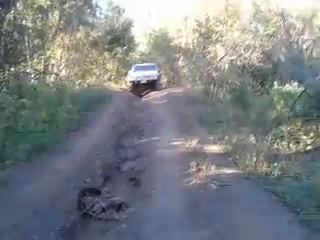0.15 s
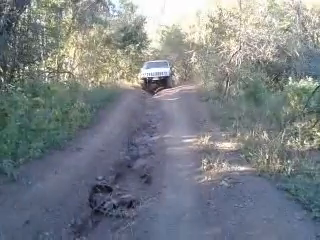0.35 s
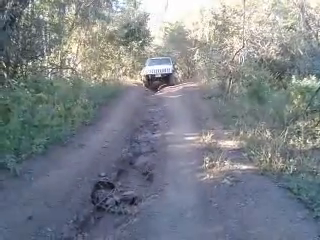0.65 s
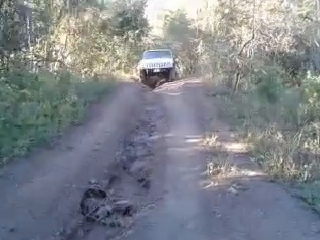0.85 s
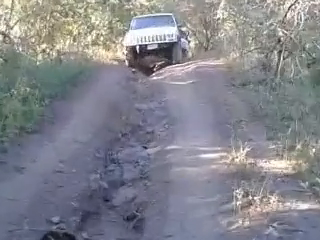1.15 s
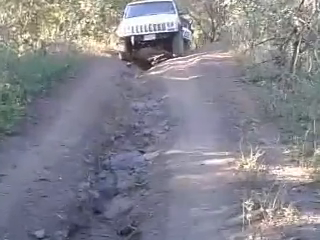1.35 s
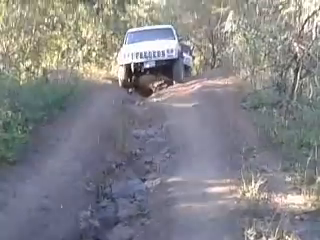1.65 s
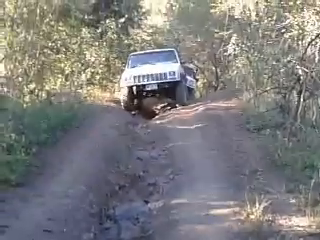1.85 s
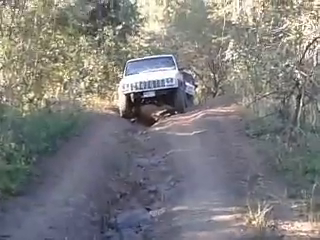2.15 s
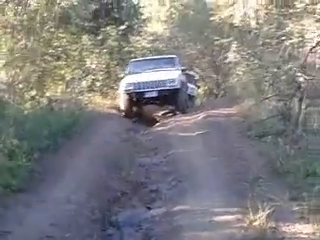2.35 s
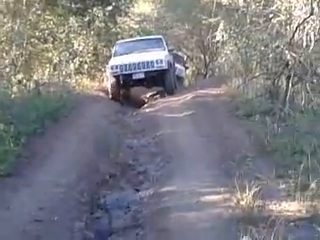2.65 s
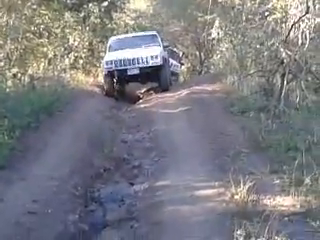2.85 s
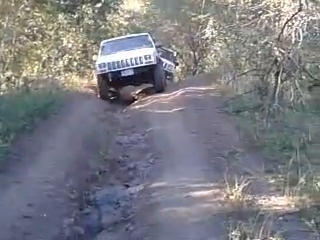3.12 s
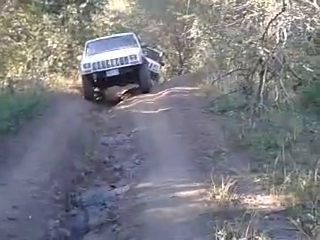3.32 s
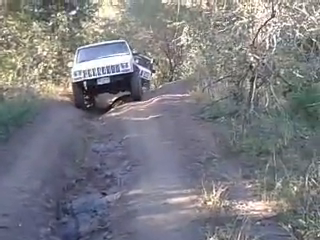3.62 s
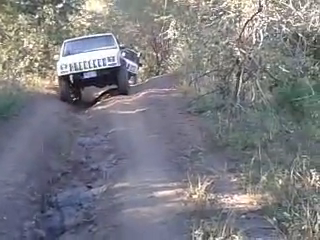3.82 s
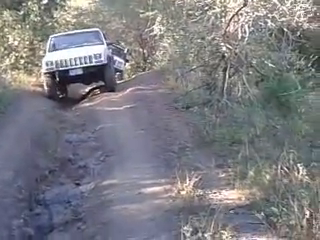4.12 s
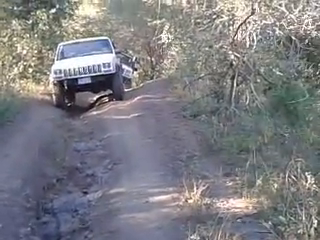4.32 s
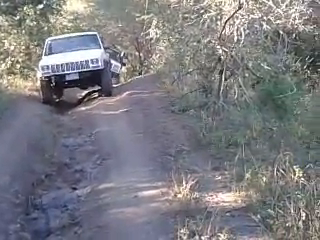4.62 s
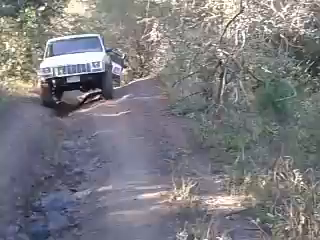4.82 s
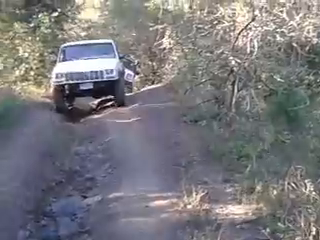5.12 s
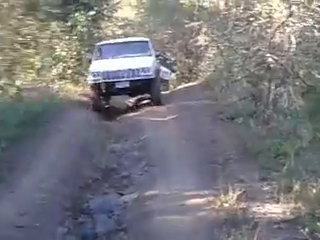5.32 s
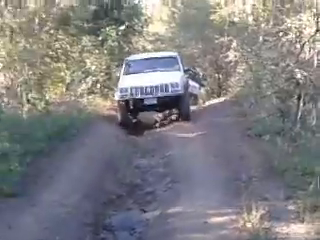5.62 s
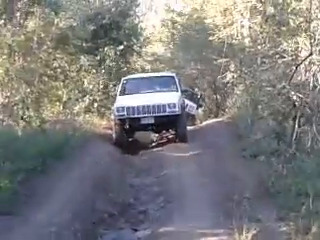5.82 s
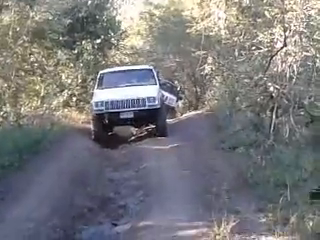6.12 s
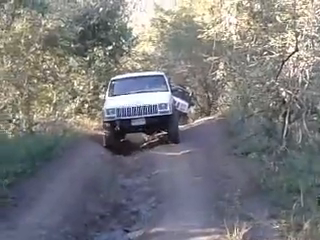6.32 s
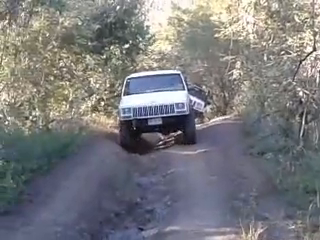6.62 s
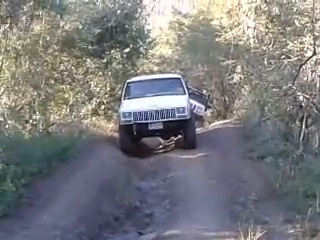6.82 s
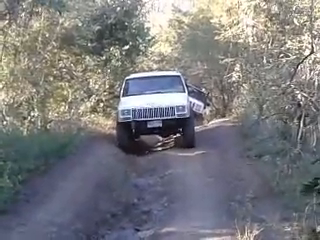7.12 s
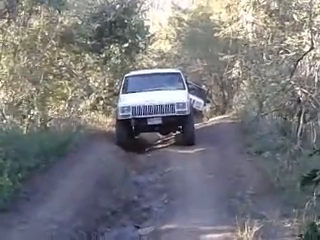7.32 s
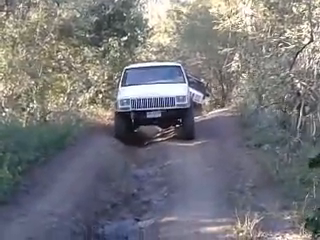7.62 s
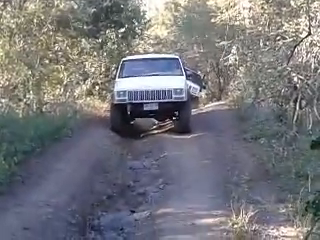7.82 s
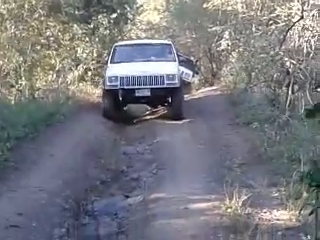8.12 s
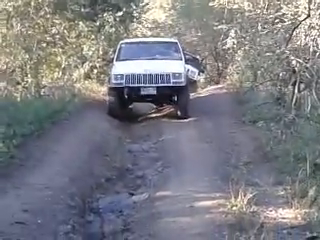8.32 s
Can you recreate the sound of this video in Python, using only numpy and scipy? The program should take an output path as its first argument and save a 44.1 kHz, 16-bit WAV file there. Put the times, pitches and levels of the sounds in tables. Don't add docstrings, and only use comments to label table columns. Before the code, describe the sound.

After a tiny silence, fingers knock and scrape the plastic camera case loudly, right at the microphone. A small zoom motor hums for about a second. Behind it a six-cylinder off-road vehicle idles unevenly on a forest trail, with another engine throbbing low nearby. A second burst of hard knocks follows after two seconds, then the engine's hum, roar and growing whine continue with sparse clicks, over faint leaf hiss. Narrow, dull camera sound.

```python
import sys
import numpy as np
from scipy import signal
from scipy.fft import rfft, irfft, next_fast_len
from scipy.io import wavfile
from scipy.ndimage import uniform_filter1d

SR = 44100
rng = np.random.default_rng(int(sys.argv[2]) if len(sys.argv) > 2 else 0)


def persist_wave(psi):
    counts = np.round(np.clip(psi, -1, 1) * 32767).astype(np.int16)
    wavfile.write(sys.argv[1], SR, np.atleast_2d(counts).T)


def linear_from_db(decibels):
    return 10 ** (np.asarray(decibels, float) / 20)


N = 373086
TIME = np.arange(N) / SR
TAIL = 4096
RING_TIME = np.arange(TAIL) / SR

# [t/s, ring peak level/dB, ring f/Hz, crunch level/dB]
PALM_THUDS = [(.266, -14.5, 395, -24), (.349, -9.5, 273, -18.5), (0.4107, -17.5, 415, -22),
              (2.0706, -32, 156.2, -27.5), (2.418, -7, 330, -13.5), (2.422, -14.5, 160, -34),
              (2.607, -15, 400, -38), (2.955, -25, 300, -22), (5.283, -25, 235, -46), (6.6, -33, 218, -50),
              (2.153, -20.5, 242, -30), (.164, -11, 375, -30), (2.9545, -23, 450, -40),
              (2.33, -14, 260, -30)]


def level(x, db):
    return x * linear_from_db(db) / np.sqrt(np.mean(x ** 2))


def curves(table):
    s, *columns = np.transpose(table)
    return [np.interp(TIME, s, c) for c in columns]


def band(x, hz, width):
    return signal.lfilter(*signal.iirpeak(hz, hz / width, fs=SR), x)


def highpass(x, order, hz):
    return signal.sosfilt(signal.butter(order, hz, "high", fs=SR, output="sos"), x)


def colour(x, points):
    hz, db = np.transpose(points)
    size = next_fast_len(len(x))
    f = np.log(np.arange(size // 2 + 1) * SR / size + 1)
    gain = linear_from_db(np.interp(f, np.log(hz), db))
    return irfft(rfft(x, size) * gain, size)[:len(x)]


def walk(rate):
    k = int(SR / rate)
    held = np.repeat(rng.standard_normal(N // k + 1), k)
    return 1.31 * uniform_filter1d(uniform_filter1d(held, k), k)[:N]


def tone(cycles, db, wobble_db):
    return np.sqrt(2) * linear_from_db(db + wobble_db * walk(5.2)) * np.sin(2 * np.pi * cycles)


def engine():
    # [t/s, firing rate f/Hz, load level/dB, exposure of the engine bay level/dB]
    approach = [(0.45, 35.72, 0, -1), (1.12, 35.37, -1, -3.5), (1.41, 37.1, -4, .5), (1.6, 35.5, -1.5, 1),
                (2.2, 36.5, 3.5, 4), (2.77, 35.4, -11, 1), (3.28, 37.62, 3, 5.5), (3.73, 36.93, 9, 4.5),
                (4.11, 36.38, 4.5, 3.5), (4.6, 35.64, -5, 4), (4.91, 34.94, -17, 5.5),
                (5.67, 37.83, 4.5, 4.5), (5.85, 36.7, -2, 3.5), (6.2, 37.45, -1.5, 6),
                (6.85, 35.79, -0.5, 5), (7.3, 36.62, -1, 4.5), (7.63, 35.77, -1, 5.5),
                (8.46, 35.84, -7, 7.5)]
    hz, load_db, open_db = curves(approach)
    fired = np.cumsum(hz) / SR
    swing_s, swing_length_s = 3.44, 3
    swing = np.clip((TIME - swing_s) / swing_length_s, 0, 1)
    return (exhaust(fired, load_db, open_db) + body_thump(fired, open_db)
            + bay_roar(fired, open_db, swing) + pump(swing))


def exhaust(fired, load_db, open_db):
    # [multiple of the firing rate, level/dB]
    orders = [(1, -63.5), (2, -61.5), (3, -66), (4, -52.5), (5, -61.5), (7, -86), (8, -66)]
    hum = sum(tone(k * fired, db, 1.8) for k, db in orders)
    hum += tone(6 * fired, -54 + load_db, 1.5)
    return hum + tone(9 * fired, -55 + open_db, 1.8)


def body_thump(fired, open_db):
    # [f/Hz, width/Hz, level/dB]
    panels = [
        (134, 26, -1.5),
        (192, 10, -16),
        (310, 28, 8.5),
        (400, 22, -16),
    ]
    turn = np.flatnonzero(np.diff(np.floor(fired / 3 + .3)))
    strokes = np.zeros(N)
    strokes[turn] = linear_from_db(2.2 * rng.standard_normal(len(turn)))
    thump = sum(linear_from_db(db) * band(band(strokes, f, w), f, 2 * w) for f, w, db in panels)
    return level(highpass(thump, 4, 120), -58 + 1.56 * open_db)


def bay_roar(fired, open_db, swing):
    # [f/Hz, width/Hz, level/dB]
    cavities = [(330, 88, -13), (834, 130, -8), (1000, 80, -9), (1229, 44, -6.5), (1281, 126, -5.5),
                (1579, 205, -4), (2040, 150, -11.5), (2454, 270, -16.5), (4326, 250, -15.5)]
    upper_db = 3.5 - 0.97 * open_db - 1.5 * swing
    roar = np.zeros(N)
    for f, w, db in cavities:
        wavering_db = db + (f > 1400) * upper_db + 1.3 * walk(1.479) + 0.71 * walk(12)
        roar += level(band(rng.standard_normal(N), f, w), wavering_db)
    puff = 1 + 0.097 * np.cos(2 * np.pi * fired)
    return level(roar, -44 + open_db + 0.45) * puff


def pump(swing):
    # [f/Hz, far level/dB, near level/dB]
    belts = [
        (4926, -74, -65),
        (2439, -70, -70),
    ]
    pump_hz, far_pump_db, pump_gain_db = 822, -66, 18.5
    whine = tone(np.cumsum(pump_hz + 1.5 * walk(3)) / SR, far_pump_db + pump_gain_db * np.sqrt(swing), 1.5)
    near = np.clip((TIME - 5.9) / .6, 0, 1)
    for f, far_db, near_db in belts:
        whine += tone(np.cumsum(f + 8 * walk(4.7)) / SR, far_db + (near_db - far_db) * near, 1.2)
    return whine


def handling():
    # [f/Hz, level/dB]
    crack = [(150, -8.5), (400, -1), (1000, -9.5), (2200, -0.5), (4000, -20), (7000, -17), (8500, -37.5)]
    noise = rng.standard_normal(N + TAIL)
    ring, crunch = blows()
    crunch += scrapes()
    case = ring + ticks(noise) + crunch * level(colour(noise[::-1], crack), 0)
    return (highpass(case, 2, 110) + jolts())[:N]


def blows():
    # [t/s, ring peak level/dB, ring f/Hz, crunch level/dB]
    taps = [(0.1641, -4, 777, -14), (0.179, -13, 514, -30), (0.191, -16, 880, -21), (.2445, -2.5, 486, -6),
            (0.317, -19.5, 1175, -11), (0.3473, -7, 940, -16), (0.41, -9, 1280, -10),
            (2.15, -6, 1000, -9.5), (2.187, -23, 1000, -33), (2.293, -18.5, 865, -22), (2.4, -14, 539, -44),
            (2.417, -4.5, 964, -3.5), (2.575, -22, 1160, -33), (2.58, -20, 910, -32), (2.6, -4, 980, -22),
            (2.6325, -12.5, 764, -35), (2.634, -10.5, 1020, -26), (2.644, -25, 870, -34),
            (2.674, -27, 1580, -24.5), (5.659, -22.5, 596, -31), (7.982, -26, 1200, -50)]
    # [t/s, ring peak level/dB, ring f/Hz, crunch level/dB]
    raps = [(0.1274, -12, 650, -28), (0.1622, -8.5, 452, -9), (.185, -19, 660, -32),
            (0.4171, -15.5, 1066, -14.5), (2.0712, -9.5, 1105, -7), (2.152, -17, 670, -8.5),
            (2.163, -17, 520, -37), (2.324, -9.5, 738, -24.5), (2.3285, -4.5, 510, -20.5),
            (2.596, -5, 796, -11.5), (5.281, -18.5, 572, -42), (6.195, -26, 896, -39),
            (6.186, -30, 1403, -40), (6.203, -21.5, 1290, -44), (6.212, -29, 680, -42),
            (2.597, -10, 522.6, -30)]
    tap_t60_s, rap_t60_s, thud_cycles = .016, 0.025, 8.1
    struck = [(*b, tap_t60_s) for b in taps]
    struck += [(*b, rap_t60_s) for b in raps]
    struck += [(*b, thud_cycles / b[2]) for b in PALM_THUDS]
    ring, crunch, t = np.zeros(N + TAIL), np.zeros(N + TAIL), RING_TIME
    spread = rng.uniform(-1.07, 1, (64, 2))
    for (s, db, hz, crunch_db, t60), (low, high) in zip(struck, spread):
        at = slice(int(s * SR), int(s * SR) + TAIL)
        turn = 2 * np.pi * hz * (t + 0.2 * 0.0035 * (1 - np.exp(-t / 0.0014)))
        modes = np.sin(turn)
        modes += 0.69 * np.sin((0.66 + 0.21 * low) * turn)
        modes += 0.3 * np.sin((1.54 + 0.25 * high) * turn)
        ring[at] += linear_from_db(db + 1.0 - 60 * t / t60) * (1 - np.exp(-t / 0.00067)) * modes
        crunch[at] += linear_from_db(crunch_db + 3 - 60 * t / (.45 * t60)) * (1 - np.exp(-t / .0004))
    return ring, crunch


def ticks(noise):
    # [t/s, peak level/dB]
    snaps = [(.128, -20), (0.199, -20), (0.3147, -17.5), (0.352, -29), (0.4108, 4.5), (2.0721, -10),
             (2.148, -11), (2.1521, -9.5), (2.231, -29), (2.285, -22.5), (2.289, -24), (2.292, -18),
             (2.329, -15), (2.39, -34), (2.414, -10.5), (2.417, -4), (2.49, -30), (2.573, -27), (2.58, -22),
             (2.645, -30), (2.674, -21.5), (2.867, -24.5), (2.955, -23), (4.27, -33), (7.155, -33)]
    # [t/s, peak level/dB]
    clicks = [(0.1621, -10), (0.4103, -6), (0.183, -22.5), (0.201, -25.5), (.231, -29), (.237, -28),
              (0.2442, -6.5), (0.2645, -15), (0.327, -30), (0.4147, -15.5), (2.0713, -14.5), (2.332, -34),
              (2.429, -35), (2.538, -34), (2.552, -33), (2.56, -36), (2.594, -12.5), (2.659, -31),
              (2.751, -34), (7.156, -37)]
    # [t/s, peak level/dB, centre f/Hz]
    clacks = [(0.2646, -20.5, 2450), (.394, -35, 2990), (0.4157, -13.5, 2482), (2.071, -15, 3550),
              (2.592, -22.5, 2800), (4.664, -32, 2520), (4.6615, -27, 3980), (7.23, -33.5, 2700)]
    # [t/s, peak level/dB]
    pings = [
        (4.6613, -12.5),
        (4.667, -29),
        (4.671, -24),
        (4.693, -33),
    ]
    # [t/s, peak level/dB]
    twigs = [
        (7.229, -34),
        (7.235, -34),
        (7.27, -34),
    ]
    # [centre f/Hz, width/Hz, t60/s]
    twig = (6050, 1240, 0.0096)
    bursts = [(*k, 4360, 7300, 0.0061) for k in snaps]
    bursts += [(*k, 6240, 1700, 0.013) for k in clicks]
    bursts += [(*k, 6850, 900, 0.017) for k in pings]
    bursts += [(*k, 1200, 0.025) for k in clacks]
    bursts += [(*k, *twig) for k in twigs]
    out, t = np.zeros(N + TAIL), RING_TIME
    for s, db, hz, width, t60 in bursts:
        at = slice(int(s * SR), int(s * SR) + TAIL)
        burst = level(band(band(noise[at], hz, width), hz, width), db)
        out[at] += burst * linear_from_db(-60 * (t / (.5 * t60)) ** 1.6) * (1 - np.exp(-t / .0003))
    return out


def scrapes():
    # [start t/s, end t/s, level/dB, slip rate f/Hz]
    slides = [(0.163, 0.22, -29, 700), (0.218, 0.25, -26.5, 790), (2.2, 2.169, -33, 700),
              (2.35, 2.288, -37, 500), (2.278, 2.325, -42, 500), (2.45, 2.38, -35.5, 590),
              (2.553, 2.8, -43.5, 500), (2.7, 2.6, -43.5, 400), (6.177, 6.231, -36.5, 1960),
              (3.42, 3.45, -37, 1800), (0.114, .128, -35, 1100), (5.62, 5.69, -44, 900),
              (2.328, 2.358, -35, 700)]
    crunch = np.zeros(N + TAIL)
    chance, size = rng.random(N), rng.exponential(size=N)
    for start_s, end_s, db, rate in slides:
        at = slice(int(start_s * SR), int(end_s * SR))
        slips = (chance[at] < rate / SR) * linear_from_db(3.26 * size[at])
        smeared = signal.lfilter([1], [1, -np.exp(-1 / (0.0016 * SR))], slips) + 0.2
        crunch[at] += level(smeared, db) * np.hanning(len(slips)) ** .5
    return crunch


def jolts():
    jolt_hz, jolt_db, jolt_t60_s = 45, -24, 0.074
    out = np.zeros(N + TAIL)
    swing = np.sin(2 * np.pi * jolt_hz * RING_TIME)
    for s, db, *_ in PALM_THUDS:
        out[int(s * SR):int(s * SR) + TAIL] += linear_from_db(db + jolt_db - 60 * RING_TIME / jolt_t60_s) * swing
    return out


def zoom():
    # [t/s, f/Hz]
    motor = [
        (0.45, 250.5),
        (0.73, 254.6),
        (1.184, 265.3),
        (1.44, 260.5),
        (1.6, 251),
        (1.66, 250),
    ]
    hz, = curves(motor)
    start_s, start_hz = motor[0]
    gear_db = -64 + 1.22 * (np.roll(hz, int(0.19 * SR)) - start_hz)
    running = np.clip(np.minimum(TIME - start_s, motor[-1][0] - TIME) / 0.1, 0, 1)
    gears = level(band(rng.standard_normal(N), 3830, 800), gear_db)
    gears += tone(np.cumsum(15 * hz) / SR, gear_db - 9, 2)
    return running * (tone(np.cumsum(hz) / SR, -50, 0.65) + gears)


def idler():
    # [t/s, drop of first order level/dB, of second level/dB]
    stumbles = [(.54, 3, 12), (.7, 3.5, 4), (1.02, 12, 12.5), (1.46, 2, 13), (2.2, 6, 15), (2.45, 17, 8),
                (3.05, -1, 6), (3.76, 5.5, 9), (4.27, 16, 12), (4.769, 15, 14.5), (5.27, 13, 12),
                (5.67, 22, 0), (6.15, -3, 12), (6.55, 4, 1), (6.75, 5, 6), (7.15, 5, 0), (7.44, 5, 17),
                (7.6, 13, -5), (7.72, 0, 11), (8.1, 2, 9)]
    idle_hz, stumble_s, recover_s = 37.7, .04, 0.15
    fired = np.cumsum(idle_hz * (1 + 0.013 * walk(14) + .012 * walk(2.5))) / SR
    s, *drops_db = np.transpose(stumbles)
    t = np.arange(0, N / SR, .005)
    since = np.maximum(t - s[:, None], 0)
    dip = (1 - np.exp(-since / stumble_s)) * np.exp(-since / recover_s)
    first_drop_db, second_drop_db = curves(np.c_[t, dip.T @ np.transpose(drops_db)])
    first_db = -53 - 1.5 * first_drop_db + 1.5 * walk(16)
    second_db = -51 - 1.3 * second_drop_db - 3 * np.abs(walk(26))
    return tone(fired, first_db, 1.2) + tone(2 * fired, second_db, 1.2)


def air():
    # [f/Hz, level/dB]
    rush_colour = [(15, -35.5), (60, -30.5), (97, -45), (118, -26), (150, -11), (250, -11), (330, -5.5),
                   (470, -6.5), (800, -7.5), (1250, -7), (2950, -19), (5000, -22.5), (7000, -31.5),
                   (7500, -23.5), (9000, -40)]
    # [t/s, level/dB]
    breeze = [(0.45, -51.5), (2.2, -54), (2.7, -56.5), (3.9, -58.5), (5.3, -57), (5.56, -54.5),
              (7.03, -55.5), (7.36, -56.5), (7.97, -55.5), (8.46, -56)]
    air_db = -47.5 - 0.47 * TIME
    hiss_db, = curves(breeze)
    rush = level(colour(rng.standard_normal(N), rush_colour), 7 + air_db + 0.98 * walk(9))
    grit = (rng.random(N) < 25 / SR) * rng.standard_normal(N) * 14
    hiss = band(band(rng.standard_normal(N) + grit, 6560, 760), 7000, 1100)
    return rush + level(hiss, hiss_db - 0.5 + 1.6 * walk(18))


def scene():
    return (engine() + handling() + zoom() + idler() + air())[None]


def band_limit(x):
    return signal.sosfilt(signal.butter(12, 9700, fs=SR, output="sos"), x)


def record(dry):
    top_cut = signal.cheby2(10, 42, 7980, fs=SR, output="sos")
    cut = signal.sosfilt(top_cut, np.clip(dry, -.98, .98))
    mirror = cut * np.cos(2 * np.pi * 16000 * TIME)
    mirror_cut = signal.cheby2(16, 70, 9600, fs=SR, output="sos")
    cut = cut + linear_from_db(-11.5) * signal.sosfilt(mirror_cut, mirror)
    start_s, offset = .1195, .0017
    on = np.clip((TIME - start_s) / .001, 0, 1)
    return band_limit(np.clip((cut + offset) * on, -1, 1))


dry = scene()
out = record(dry)
persist_wave(out)
```